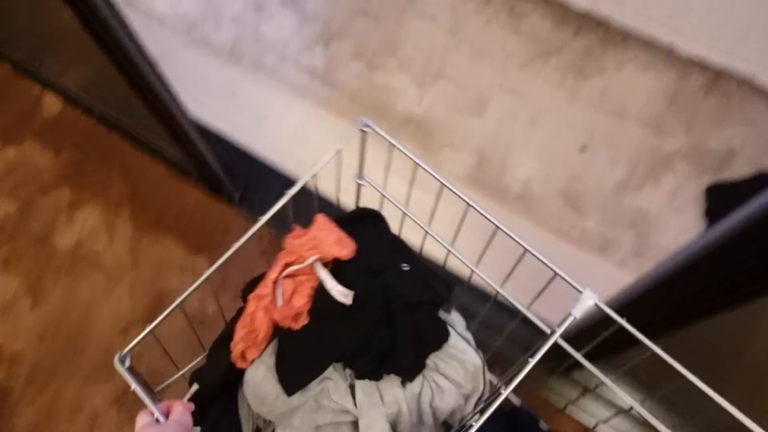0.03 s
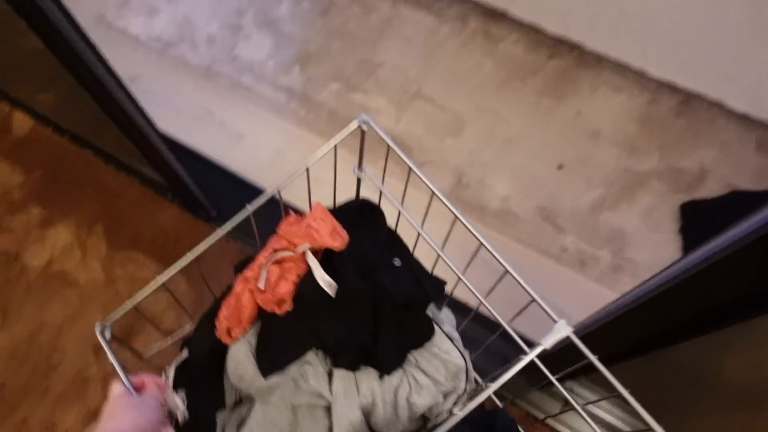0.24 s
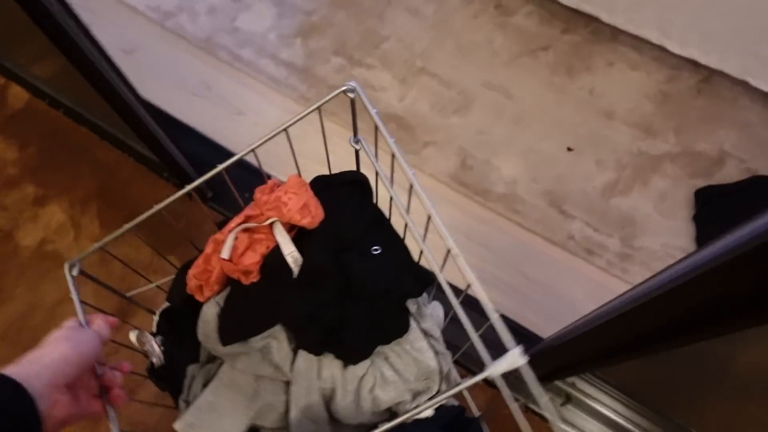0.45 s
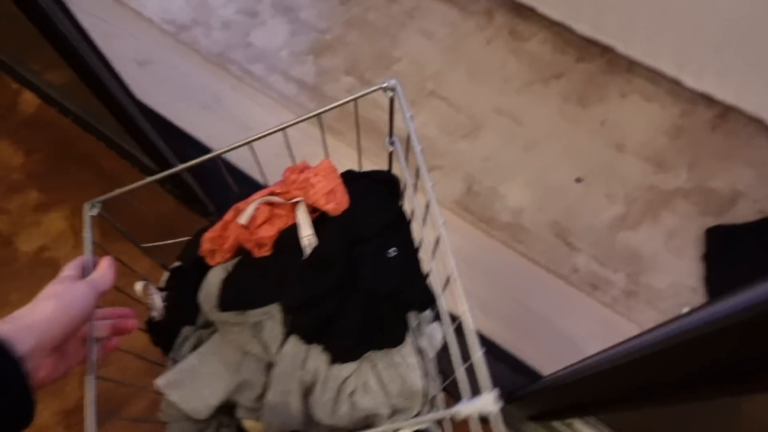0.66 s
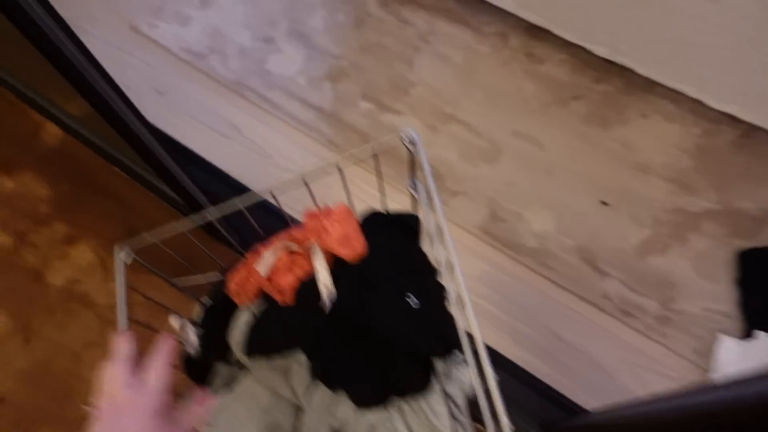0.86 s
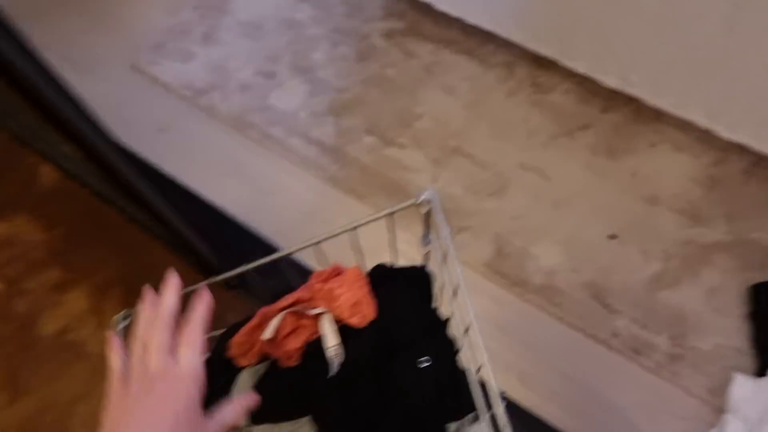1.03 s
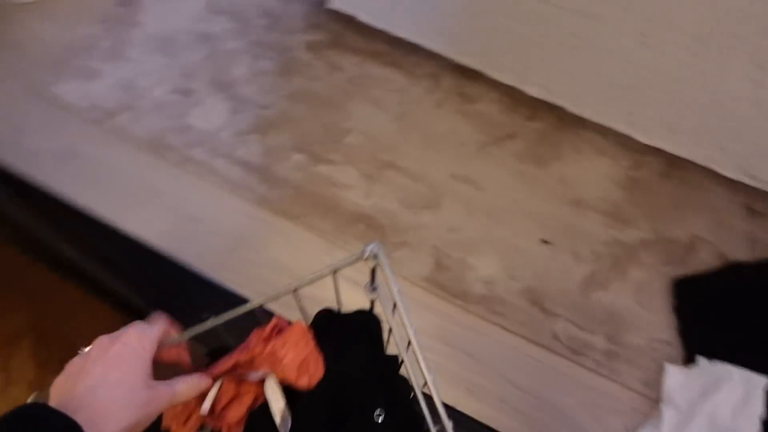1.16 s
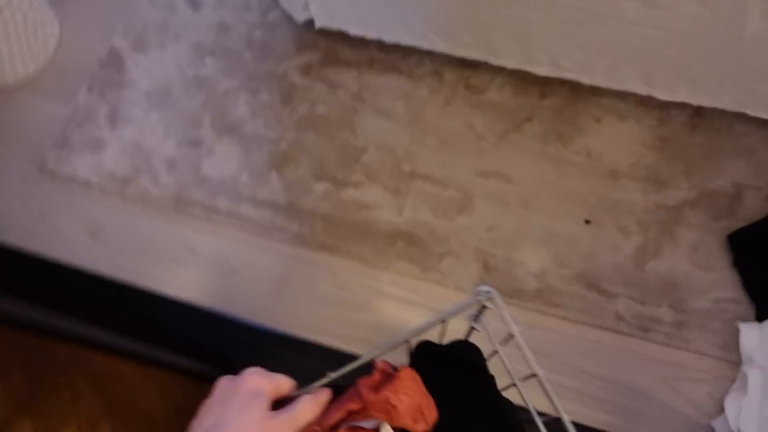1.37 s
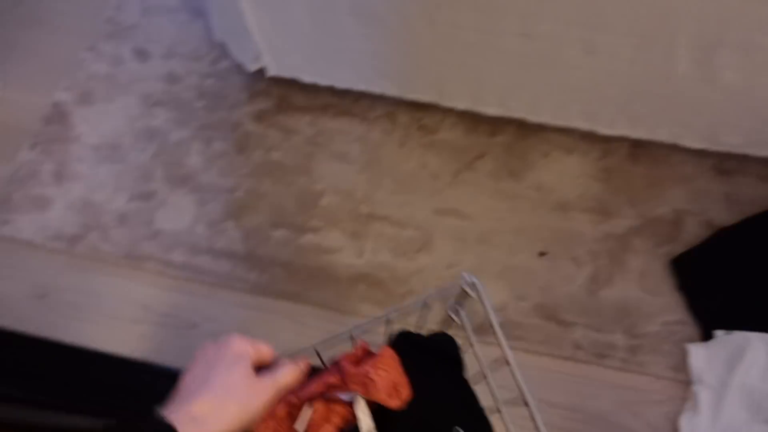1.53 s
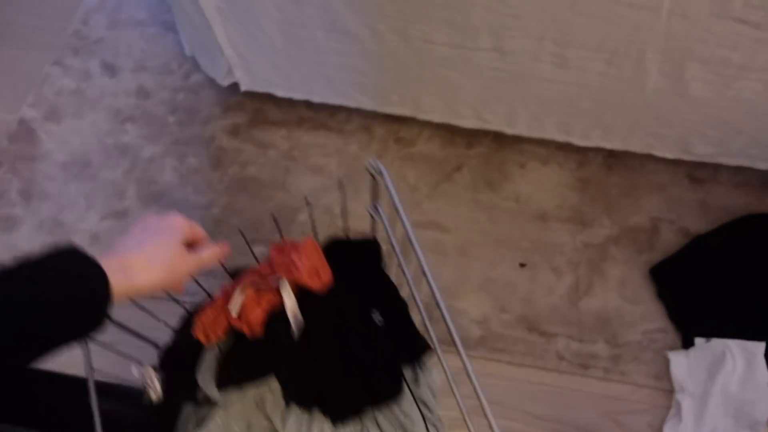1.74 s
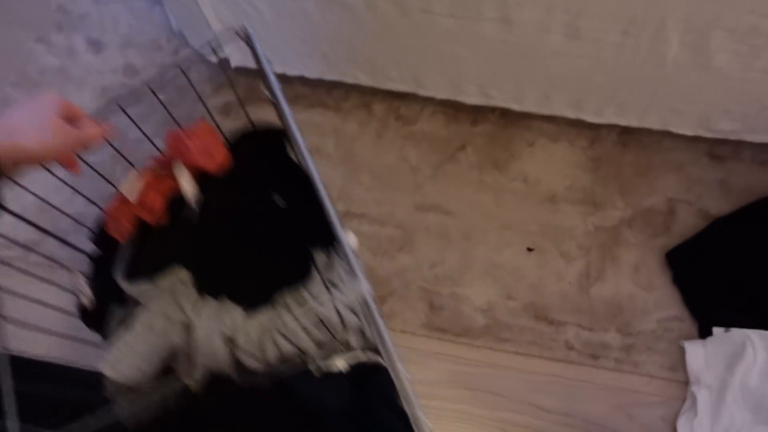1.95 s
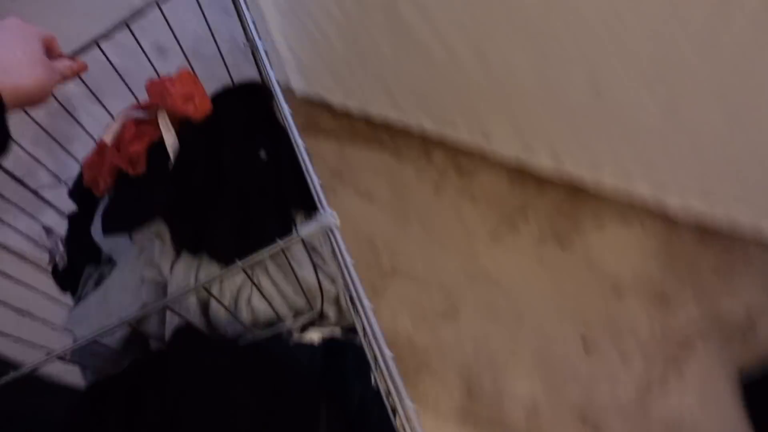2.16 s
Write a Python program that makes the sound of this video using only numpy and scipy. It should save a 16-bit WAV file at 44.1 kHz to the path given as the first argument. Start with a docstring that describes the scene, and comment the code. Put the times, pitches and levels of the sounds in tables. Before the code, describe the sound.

A wire basket full of clothes knocks and rattles as it is pulled out and lifted, close up

```python
"""A wire basket full of clothes is dragged out of a closet and lifted, close to a stereo microphone.
A faint rub and ticks come first, then knocks, hardest near 0.6 and 0.76 s; a sparse, soft stretch follows.
A hard knock lands near 1.49 s and a dense run of them from 1.7 s to the end. Each knock rings frame modes
(thud) and drives noisy contacts through resonances of rim, rods and wires (clack, rattle, sizzle).
Grainy cloth rustle and low rumble fill the gaps; a short closet tail and quiet room noise lie under all."""
import sys
import numpy as np
from scipy import signal
from scipy.fft import rfft, irfft
from scipy.io import wavfile
from scipy.ndimage import uniform_filter1d

SR = 44100
rng = np.random.default_rng(int(sys.argv[2]) if len(sys.argv) > 2 else 0)


def master(y):
    """Save y as 16-bit WAV."""
    cut = np.clip(np.atleast_2d(y).T, -1, 1)
    pcm = np.round(cut * 32767)  # scale
    wavfile.write(sys.argv[1], SR, pcm.astype(np.int16))


N = 96667
SIDES = np.array([[1], [-1]])  # left, right sign of a side signal


def undb(db):
    """Decibels to amplitude factor."""
    return 10 ** (np.asarray(db) / 20)


def unit(x):
    """Scale to rms 1."""
    return x / np.sqrt(np.mean(x ** 2))


def decay(t, t60_s):
    """Exponential decay that falls 60 dB in t60_s."""
    return np.exp(-np.log(1000) * t / t60_s)


def band(x, lo_hz, hi_hz):
    """Butterworth band-pass."""
    sos = signal.butter(2, [lo_hz, min(hi_hz, 0.45 * SR)], "band", fs=SR, output="sos")
    return signal.sosfilt(sos, x)


def highpass(x, cut_hz):
    """Fourth-order Butterworth high-pass."""
    return signal.sosfilt(signal.butter(4, cut_hz, "high", fs=SR, output="sos"), x)


def shaped(spectrum):
    """Noise with the given spectrum, interpolated over log frequency, rms 1."""
    f_hz = np.arange(N // 2 + 1) * SR / N + 1  # +1 avoids log(0)
    table_hz, table_db = np.array(spectrum).T
    gain = undb(np.interp(np.log(f_hz), np.log(table_hz), table_db))
    return unit(irfft(rfft(rng.standard_normal(N)) * gain, N))


def walk(steps_per_s):
    """Slow random curve, rms near 1: random steps joined by a moving average."""
    k = int(SR / steps_per_s)
    steps = np.repeat(rng.standard_normal(N // k + 1), k)
    return unit(uniform_filter1d(steps, k)[:N])


def add(out, x, at_s, pan_db):
    """Mix a sound into the stereo track; positive pan_db is louder left."""
    i = int(at_s * SR)
    x = x[..., :N - i]
    out[:, i:i + x.shape[-1]] += x * undb(SIDES * pan_db / 2)


def peak(x, db):
    """Scale so that the loudest 4 ms have this rms level."""
    loudest_power = uniform_filter1d(x ** 2, SR // 250, axis=-1).max()
    return x * undb(db) / np.sqrt(loudest_power)


# Knocks. Each row: start in s, thud, rim clack, rod clack, wire rattle and thin wire sizzle levels in dB,
# left-right difference of all but the thud in dB, thud pitch in Hz, contact decay time constant in ms,
# build-up scale in ms, thud damping as a factor.
KNOCKS = [(0.285, -58.5, -59.5, -63.5, -71, -74, 12.5, 276, 6.2, 2.3, 0.74),
          (0.476, -59, -81, -68, -57, -68, 4, 310, 2, 6.6, 0.81),
          (0.516, -47.5, -58, -54.5, -52.5, -78, 2, 347, 11, 6.1, 2.3),
          (0.591, -22.5, -34.5, -31.5, -46.5, -69, 0, 340.4, 3.3, 3.3, 0.49),
          (0.646, -51.5, -44.5, -54.5, -82, -76, -2, 302, 1.3, 3.6, 3.3),
          (0.741, -47, -51, -45.5, -56, -69, 1, 417, 5.8, 2.1, 0.97),
          (0.76, -18, -37, -42, -37, -55.5, 2, 339, 7.9, 1.3, 0.94),
          (0.771, -46, -48, -48, -68, -64, -2.5, 345, 2.1, 2.3, 0.53),
          (0.818, -43, -52, -66, -90, -67, 4, 281, 1.5, 3, 1.4),
          (1.001, -62.5, -68, -67, -59.5, -80, 6, 410, 1.7, 4.8, 1.5),
          (1.054, -51.5, -78, -67, -75, -89, 12, 356, 2.2, 3, 1.1),
          (1.129, -73, -89, -73, -58.5, -76, 2, 407, 6.5, 2.2, 1.4),
          (1.209, -69, -81, -75, -53, -51.5, 5, 406, 2.5, 5.4, 0.81),
          (1.219, -67, -67, -73, -50, -51, -1, 347, 6.9, 2.2, 1.1),
          (1.279, -55, -81, -70, -40, -36, 1.5, 397, 3.3, 3.6, 0.37),
          (1.381, -60, -63, -59, -52.5, -60, 14, 410, 1.8, 2.8, 0.92),
          (1.446, -49, -52.5, -54, -49, -75, 2, 353, 4, 8.8, 0.9),
          (1.485, -16.5, -29.5, -38.5, -27.5, -43, 1.5, 336.3, 2.8, 3.3, 0.93),
          (1.518, -33.5, -38.5, -49.5, -49.5, -54, 2, 392.5, 1.33, 2.5, 0.75),
          (1.711, -19.5, -59, -49, -43, -63, 8.5, 369, 12, 5.1, 1.6),
          (1.723, -13, -25.5, -37, -38.5, -76, 1, 342, 2.6, 3.3, 1.9),
          (1.734, -25, -37, -45, -45, -60, 4, 307, 5.9, 1.9, 0.66),
          (1.753, -22, -34, -62, -55, -74, -5, 345, 2, 2.3, 1.3),
          (1.787, -20, -17, -23.5, -32, -50, 2, 375, 2.25, 2, 1.55),
          (1.811, -50, -36, -31.5, -36, -53, 4.5, 420, 1.33, 7.3, 0.62),
          (1.849, -31, -64, -50, -35, -55, -0.5, 353, 2.6, 1.2, 1.6),
          (1.892, -30.5, -58, -40, -40.5, -72, 3, 304, 8.6, 3, 3.3),
          (1.953, -24, -21.5, -29.5, -26.5, -41, -1, 360, 2.3, 2.8, 2.9),
          (1.96, -23, -31, -32, -40, -56, 4, 335, 1.6, 5.1, 1),
          (1.988, -13, -18, -26.5, -30, -47, -1, 336.6, 5.6, 2.15, 0.92),
          (2.045, -54, -56, -47, -60, -70, 4, 352, 2.5, 3, 1.1),
          (2.066, -12, -22, -31.5, -34, -37, 0.0, 318, 1.66, 2.8, 1.9),
          (2.107, -20.5, -59, -52, -63, -52, -5, 368, 3.1, 2.4, 2.6),
          (2.142, -17, -20, -27.5, -31.5, -37, 0.5, 313, 2.6, 1, 1.5),
          (2.148, -42, -24.5, -35, -56, -41, 2, 363, 2, 2.5, 1.1),
          (2.165, -25, -25, -45, -58, -46, 2, 410, 2.6, 3, 1.3)]
# Broad resonances of many damped wires. Each row: centre in Hz, width in Hz, relative level in dB.
RIM = [(515, 126, 2), (643, 117, -3), (803, 218, -1.5), (1034, 155, -1.5), (1287, 283, -4), (1084, 53, -6)]
RODS = [(1446, 300, 3.5), (1780, 380, -5), (2190, 360, -2), (2580, 440, -7), (3220, 800, -7.5)]
WIRES = [(3060, 400, 1), (3773, 750, 2), (4520, 1860, 1), (5220, 2380, -0.5), (6440, 2360, -7),
         (7540, 1930, -27.5), (3184, 59, -6.5), (3923, 59, 2.5), (5706, 90, 3.5)]
THIN = [(6340, 790, -6), (7700, 1160, 2), (8280, 1300, -1.5), (9470, 1650, 1), (10830, 830, -4.5),
        (12040, 2100, -4.5), (14500, 1500, -13)]
# Parts shaking on after contact; rows are rim, rods, wires, thin wires.
# Each row: level relative to the contact in dB, t60 in s, left-right differing share (0-1).
SHAKE = [(-11, 0.21, 0.26), (-12.5, 0.29, 0.33), (-14, 0.34, 0.31), (-8, 0.23, 0.3)]
THUD_PUSH_MS, FRAME_HZ = 0.69, 340.7
RATTLE_PER_S, RATTLE_SCATTER_DB, UNEVEN_DB = 5000, 2.2, 1.1


def knocks():
    """A soft push rings the frame; a dying run of small contacts sounds through rim, rods and wires."""
    out, t = np.zeros((2, N)), np.arange(SR // 5) / SR
    push = np.hanning(int(THUD_PUSH_MS * SR / 1000) + 2)
    for at_s, thud_db, *part_db, pan_db, thud_hz, contact_ms, rise_ms, damping in KNOCKS:
        hit, size = rng.random((2, len(t)))
        uneven_db = UNEVEN_DB * rng.standard_normal(10)
        click_gain = undb(-RATTLE_SCATTER_DB * np.log(size + 1e-9))
        contacts = 0.4 + (hit < RATTLE_PER_S / SR) * click_gain  # 0.4: steady scrape floor
        rise = np.minimum(0.51 + t * 1000 / max(rise_ms, 0.2), 1) ** 2
        contact = np.exp(-t * 1000 / max(contact_ms, 0.3))

        thud = np.convolve(push, frame(thud_hz, damping))
        add(out, peak(thud, thud_db), at_s, 0)
        for groups, db, (shake_db, t60_s, wide) in zip((RIM, RODS, WIRES, THIN), part_db, SHAKE):
            fade = rise * (contact + undb(shake_db) * decay(t, t60_s))
            fade = fade * np.minimum((t[-1] - t) * 20, 1)  # last 50 ms ramp to zero
            drive = rng.standard_normal((2, len(t))) * contacts * fade
            mid, side = resonate(drive, groups, uneven_db)
            add(out, peak(mid + wide * side * SIDES, db), at_s, pan_db)
    return out


# Modes of the loaded frame at thud pitch FRAME_HZ, damping 1.
# Each row: frequency in Hz, relative level in dB, t60 in s.
FRAME = [(275, -3.5, 0.04), (273, -7, 0.033), (334.4, 10.5, 0.045), (380.2, 0, 0.058), (468, -25.5, 0.027)]
THUD_RISE_MS = 3.4


def frame(thud_hz, damping):
    """Decaying sine modes of the loaded frame; the grip shifts their pitch and damps them."""
    t = np.arange(SR // 6)[:, None] / SR
    mode_hz, mode_db, mode_t60_s = np.array(FRAME).T
    t60_s = mode_t60_s.clip(0.005) / max(damping, 0.2)
    sines = np.sin(2 * np.pi * mode_hz * thud_hz / FRAME_HZ * t)
    modes = undb(mode_db) * sines * decay(t, t60_s)
    rise = 1 - np.exp(-(t[:, 0] * 1000 / THUD_RISE_MS) ** 2)
    return modes.sum(axis=1) * rise


def resonate(x, groups, uneven_db):
    """Pass the contacts through broad resonances; neighbours swing in opposite sense."""
    total = 0
    for k, (hz, width_hz, db) in enumerate(groups):
        gain = (-1) ** k * undb(db + uneven_db[k])
        total = total + gain * band(x, hz - width_hz / 2, hz + width_hz / 2)
    return total


# Lone ticks. Each row: start in s, level in dB, pitch in Hz, left-right difference in dB.
TICKS = [(.191, -59, 2330, 11), (.192, -44.5, 4720, 20), (.644, -54, 7860, 10), (1.654, -46.5, 3700, 20),
         (1.656, -52.5, 7900, 21), (1.656, -45, 12500, 4)]
TICK_DECAY_MS, TICK_HALF_WIDTH = 0.55, 0.17  # half width as a share of pitch


def ticks():
    """Brief ticks of single wires: decaying noise in a band around each pitch."""
    out, t = np.zeros((2, N)), np.arange(SR // 50) / SR
    for at_s, db, hz, pan_db in TICKS:
        burst = rng.standard_normal(len(t)) * np.exp(-t * 1000 / TICK_DECAY_MS)
        tick = band(burst, hz * (1 - TICK_HALF_WIDTH), hz * (1 + TICK_HALF_WIDTH))
        add(out, peak(tick, db), at_s, pan_db)
    return out


# Faint rubs of wire and cloth.
# Each row: start in s, length in s, pitch in Hz, width in Hz, level before the swell in dB.
SQUEAKS = [(0.134, .04, 4200, 4500, -64), (.88, 0.12, 5710, 347, -66.5), (1.57, 0.15, 3300, 700, -53)]


def squeaks():
    """A rubbing wire whispers: fluttering noise in a band that swells and fades."""
    out = np.zeros((2, N))
    for at_s, length_s, hz, width_hz, db in SQUEAKS:
        n = int(length_s * SR)
        rub = rng.standard_normal(N) * undb(3.4 * walk(31))
        whisper = unit(band(rub, hz - width_hz / 2, hz + width_hz / 2))[:n]
        add(out, whisper * np.hanning(n) * undb(db), at_s, 0)
    return out


# Cloth and loose frame moving, before flutter and grain.
# Each row: time in s, low rumble level in dB, rustle level in dB.
RUSTLE = [(0.0, -65, -66), (0.38, -126, -73), (0.54, -60.5, -62.5), (0.65, -83, -65), (0.73, -54, -58.5),
          (0.82, -58, -59), (1.03, -71, -65), (1.24, -77.5, -71), (1.38, -63, -59), (1.69, -50.5, -55),
          (1.79, -30.5, -58.5), (1.93, -47.5, -52.5), (2.03, -31, -50), (2.13, -30.5, -60)]
# Cloth spectrum. Each row: frequency in Hz, relative density in dB per Hz.
CLOTH = [(350, 9), (600, -2), (698, 1.5), (1080, -4), (1880, 1), (2680, -1.5), (5870, -7.5), (8990, -15),
         (16000, -34.5)]


def rustle():
    """Clothes rub on the wires in fine grains of noise and shake the frame modes softly."""
    t = np.arange(N) / SR
    time_s, rumble_db, cloth_db = np.array(RUSTLE).T
    shaken = signal.fftconvolve(rng.standard_normal(N), frame(FRAME_HZ, 1))[:N]
    rumble = unit(shaken) * undb(5 * walk(70))
    grain = undb(1.25 * walk(360) + 0.83 * walk(28.06))
    mid, side = shaped(CLOTH), shaped(CLOTH)
    cloth = (mid + 0.91 * side * SIDES) * grain
    rumble = rumble * undb(np.interp(t, time_s, rumble_db))
    return rumble + cloth * undb(np.interp(t, time_s, cloth_db))


# Closet tail by octave band.
# Each row: centre in Hz, t60 in s, relative level in dB, left-right likeness (0-1).
TAIL = [(149, 0.57, -6, 1), (300, 0.18, -13.5, .99), (574, 0.57, -10.5, 0.96), (1110, 0.8, -10.5, 0.76),
        (2580, 0.8, -19, 0.4), (4440, 0.17, -9, 0), (9850, 0.9, -10.5, 0)]


def closet(x):
    """Dense reflections as stereo noise that dies band by band, driven by the mono sum."""
    t, response = np.arange(SR // 2) / SR, 0
    for hz, t60_s, db, like in TAIL:
        mid, side = band(rng.standard_normal((2, len(t))), hz / np.sqrt(2), hz * np.sqrt(2))
        like = np.clip(like, 0, 1)
        pair = np.sqrt(1 + like) * mid + np.sqrt(1 - like) * side * SIDES
        fade = decay(t, t60_s) * np.minimum(t / 0.002, 1)
        # divide by the root of the decay length, so that long bands gain no energy
        response = response + pair * fade * undb(db) / np.sqrt(t60_s * SR / 7)
    mono = x.mean(axis=0)
    return np.array([signal.fftconvolve(mono, r)[:N] for r in response])


# Room noise spectrum. Each row: frequency in Hz, relative level in dB.
ROOM = [(18, -50), (30, -20), (204, 5.5), (394, 6.5), (760, 0.5), (1460, 0), (2750, -14), (4080, -10),
        (14800, -15), (16000, -29)]
ROOM_DB = -69  # rms of the part common to both sides


def room():
    """Steady quiet room: shaped noise, partly different left and right."""
    mid, side = shaped(ROOM), shaped(ROOM)
    return (mid + 0.5 * side * SIDES) * undb(ROOM_DB)


LOW_CUT_HZ, TOP_HZ = 186, 16000


def scene():
    """Basket sounds, their closet tail and rustle lose their lows; the room lies under them."""
    near = knocks() + ticks() + squeaks()
    close = highpass(near + closet(near) + rustle(), LOW_CUT_HZ)
    return close + room()


def record(dry):
    """The recorder cuts the top with a steep elliptic low-pass."""
    return signal.sosfilt(signal.ellip(8, 0.2, 80, TOP_HZ, fs=SR, output="sos"), dry)


dry = scene()
out = record(dry)
master(out)
```